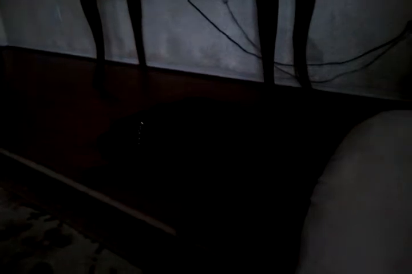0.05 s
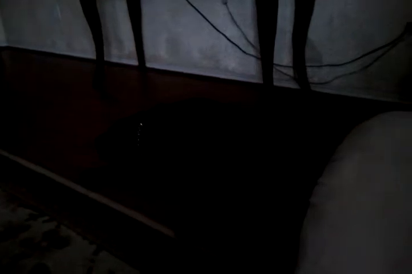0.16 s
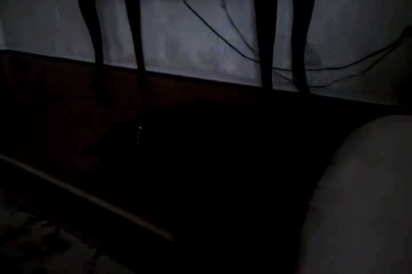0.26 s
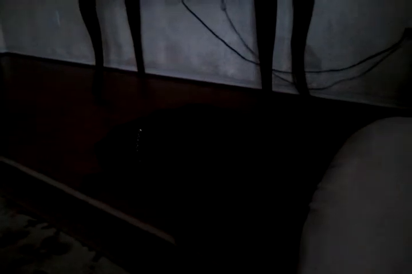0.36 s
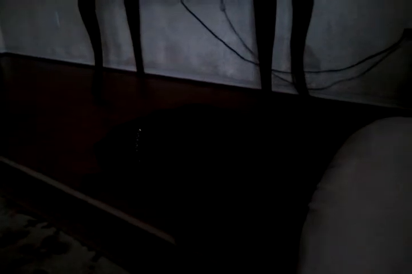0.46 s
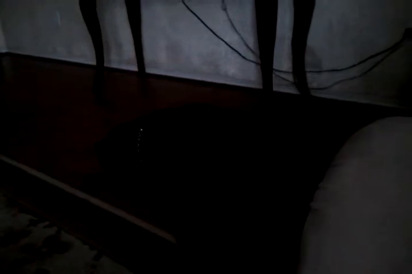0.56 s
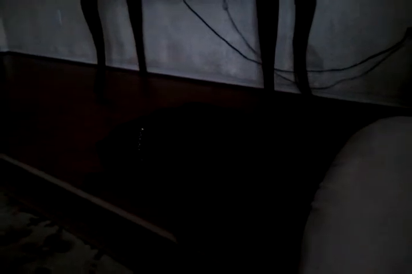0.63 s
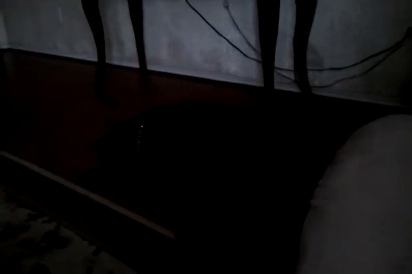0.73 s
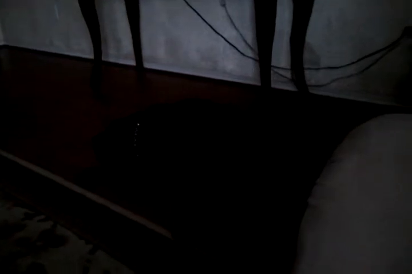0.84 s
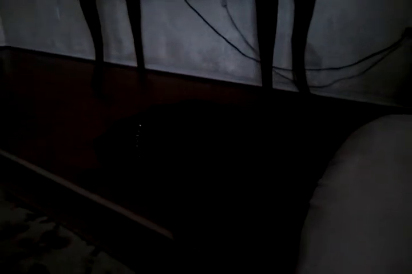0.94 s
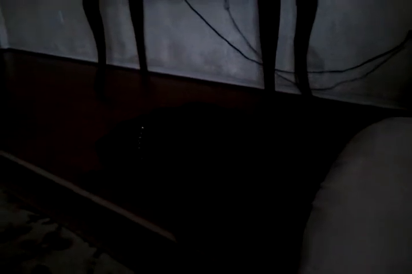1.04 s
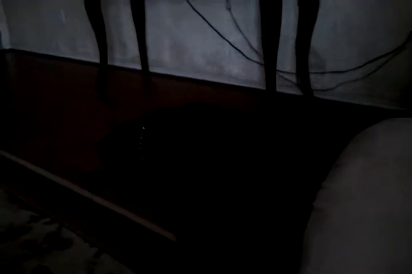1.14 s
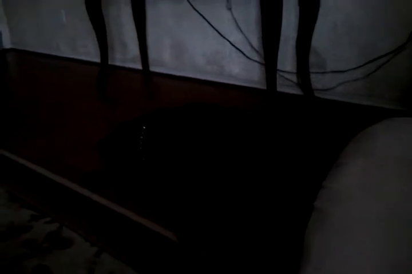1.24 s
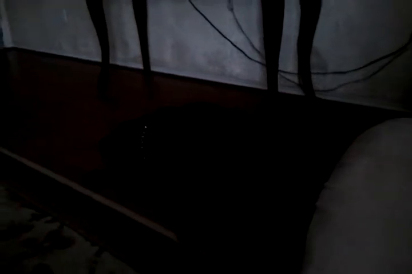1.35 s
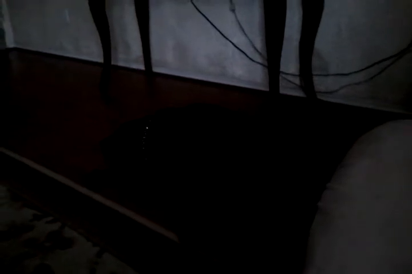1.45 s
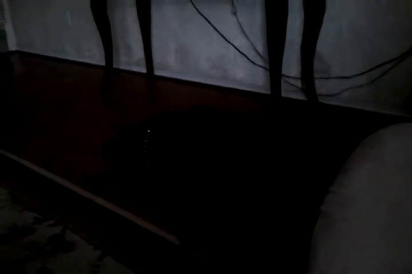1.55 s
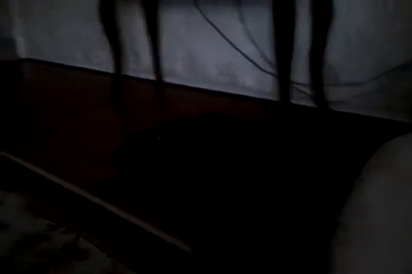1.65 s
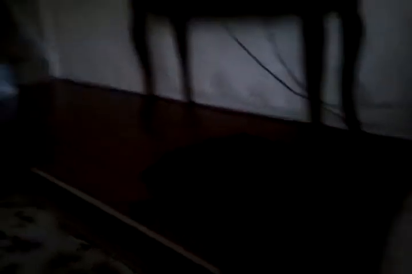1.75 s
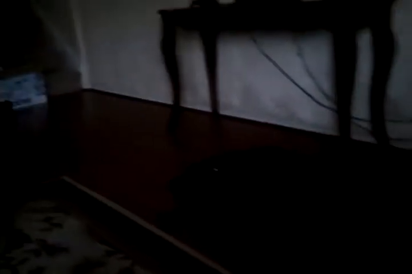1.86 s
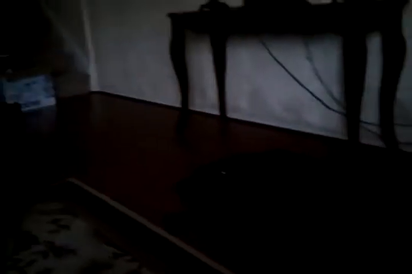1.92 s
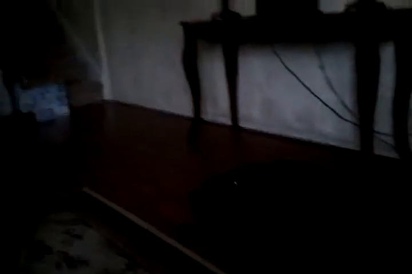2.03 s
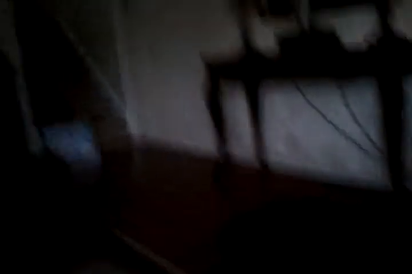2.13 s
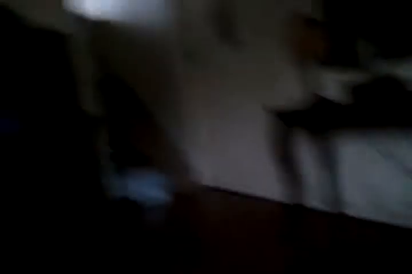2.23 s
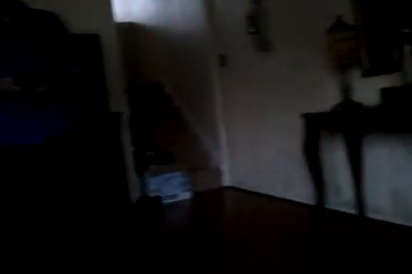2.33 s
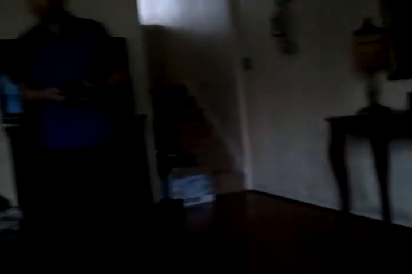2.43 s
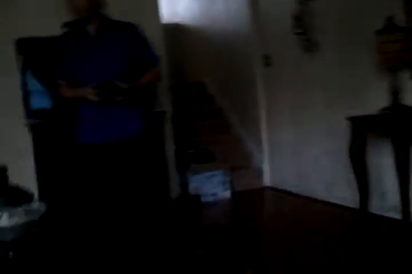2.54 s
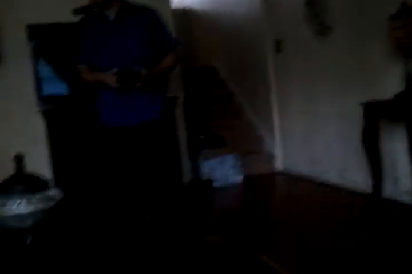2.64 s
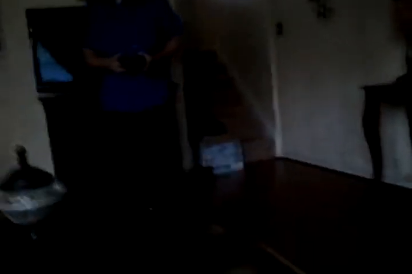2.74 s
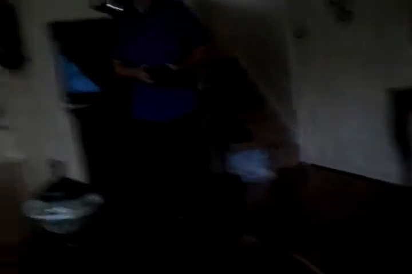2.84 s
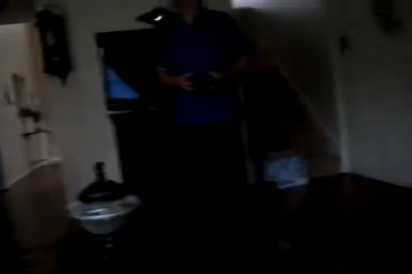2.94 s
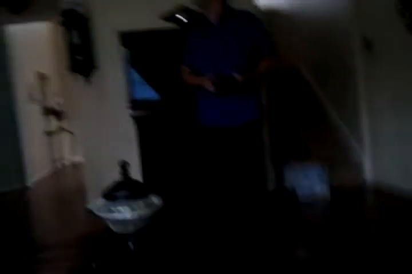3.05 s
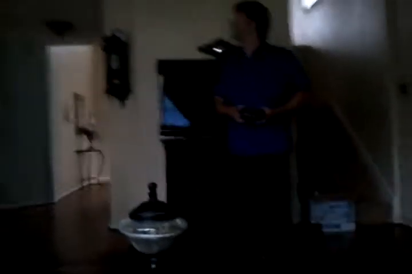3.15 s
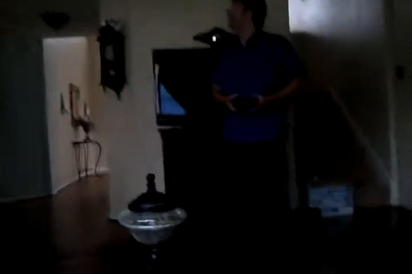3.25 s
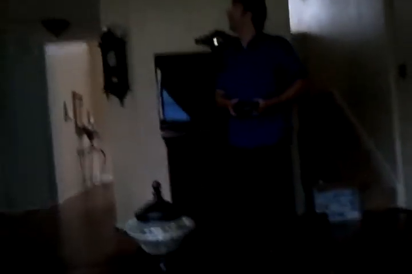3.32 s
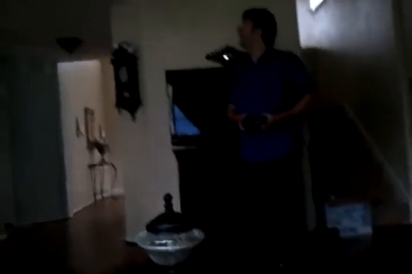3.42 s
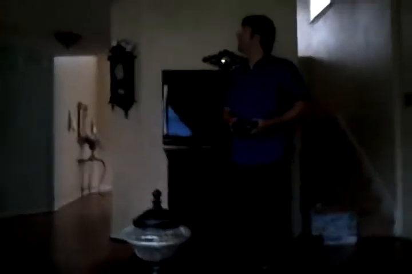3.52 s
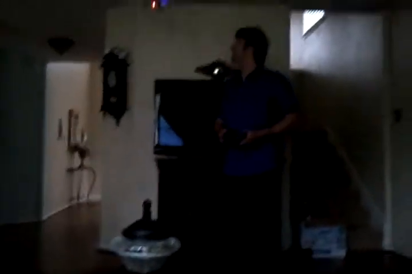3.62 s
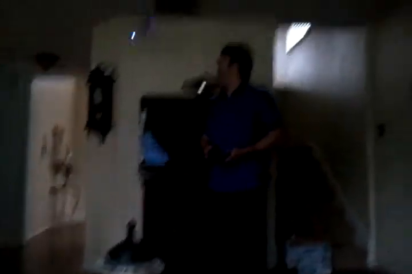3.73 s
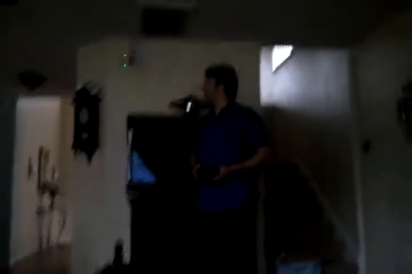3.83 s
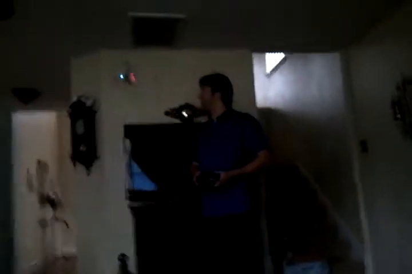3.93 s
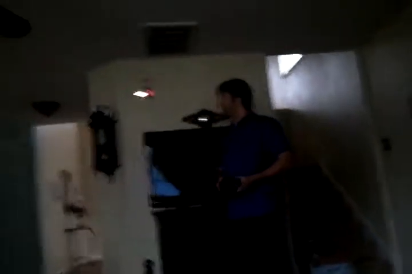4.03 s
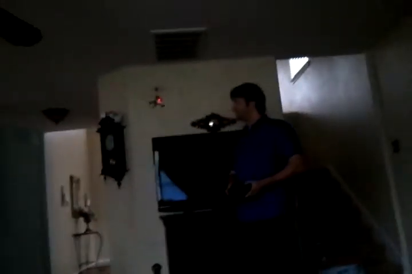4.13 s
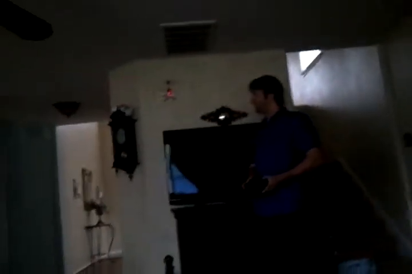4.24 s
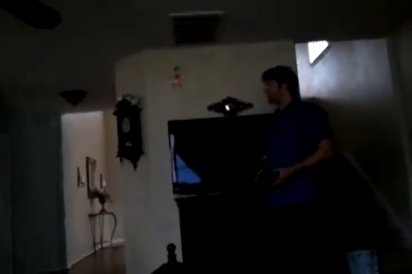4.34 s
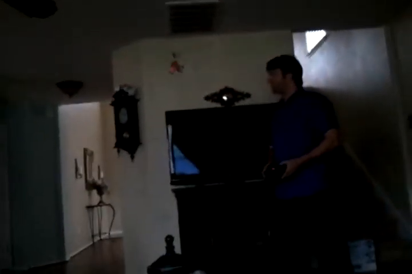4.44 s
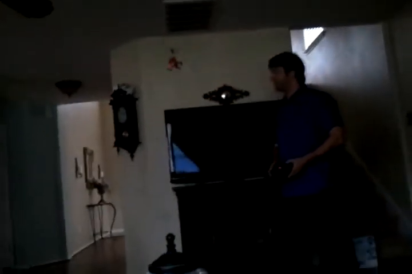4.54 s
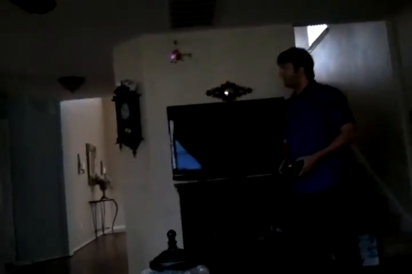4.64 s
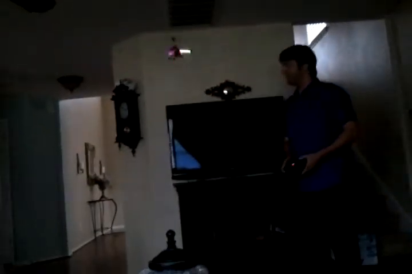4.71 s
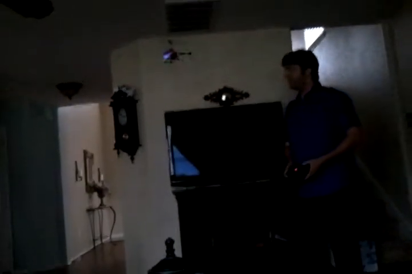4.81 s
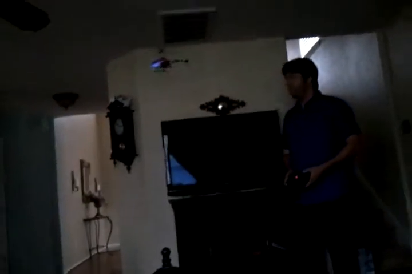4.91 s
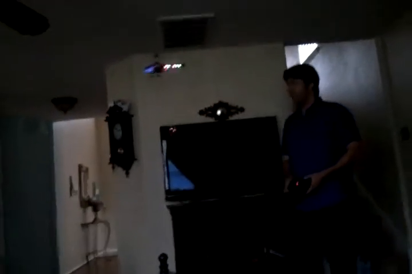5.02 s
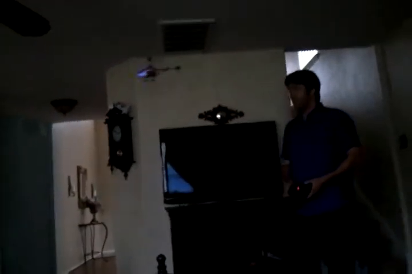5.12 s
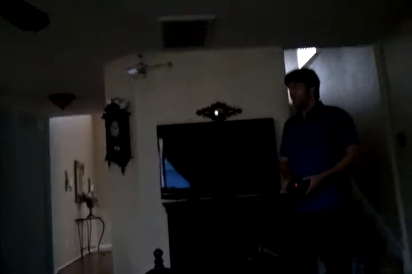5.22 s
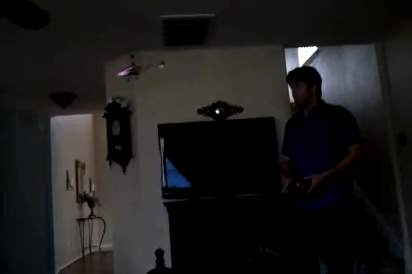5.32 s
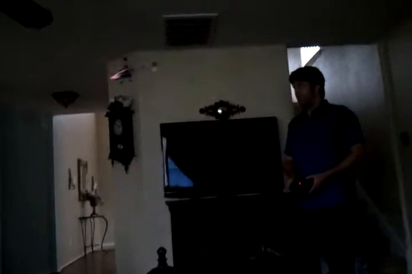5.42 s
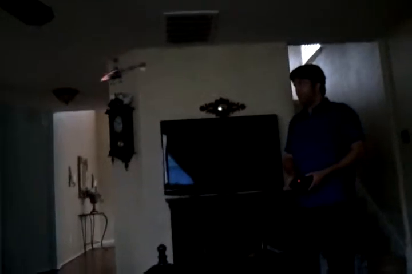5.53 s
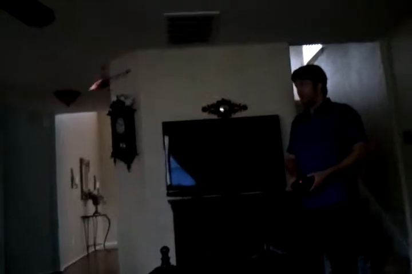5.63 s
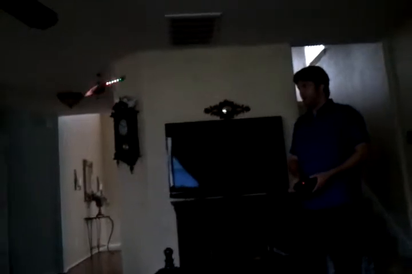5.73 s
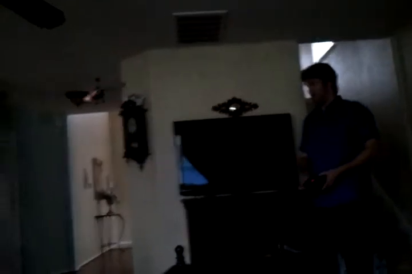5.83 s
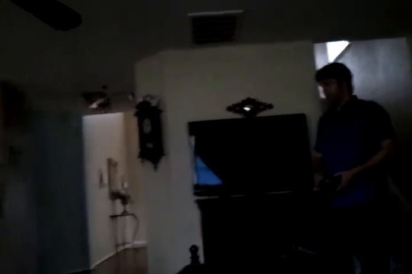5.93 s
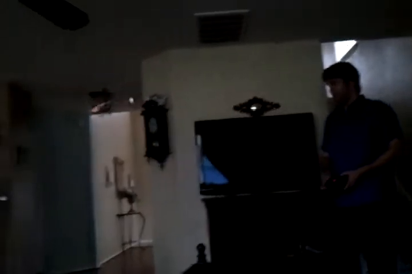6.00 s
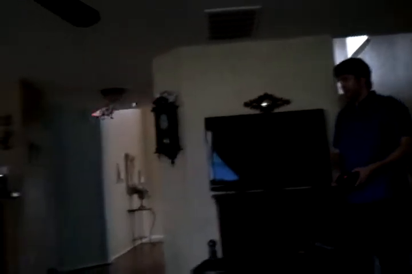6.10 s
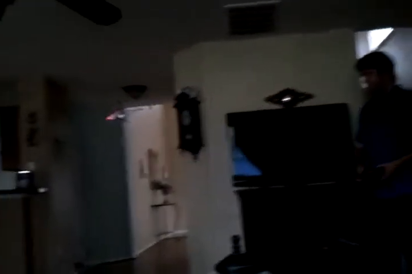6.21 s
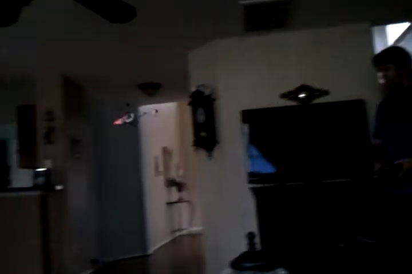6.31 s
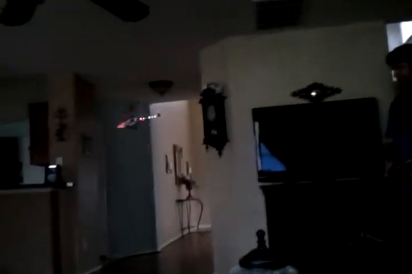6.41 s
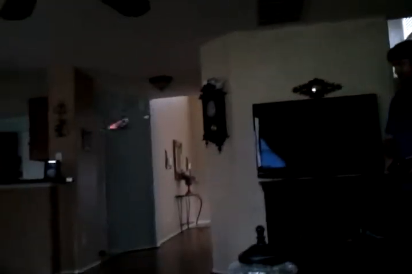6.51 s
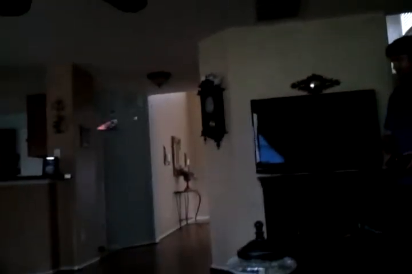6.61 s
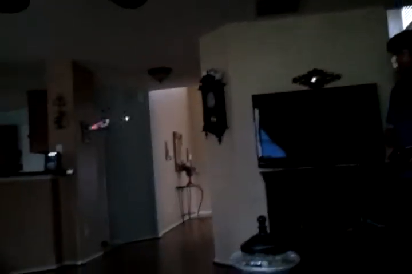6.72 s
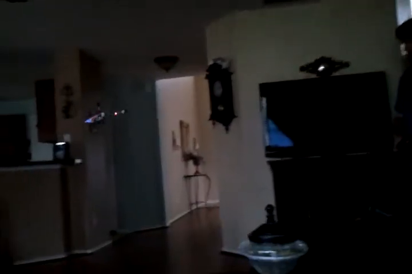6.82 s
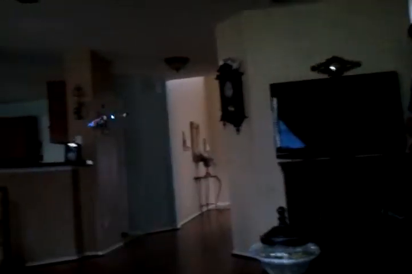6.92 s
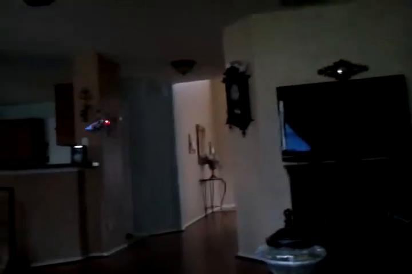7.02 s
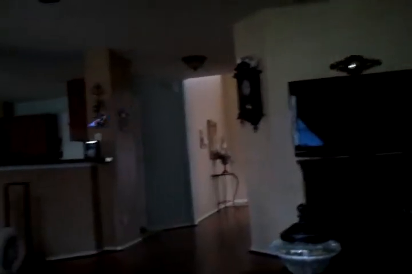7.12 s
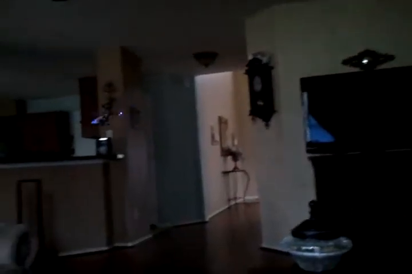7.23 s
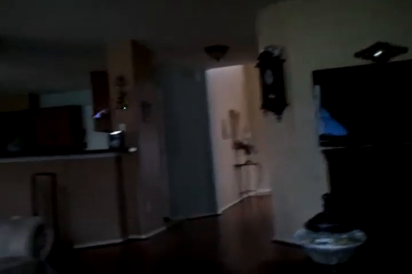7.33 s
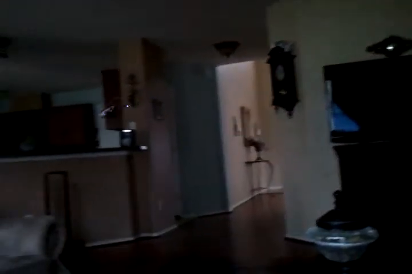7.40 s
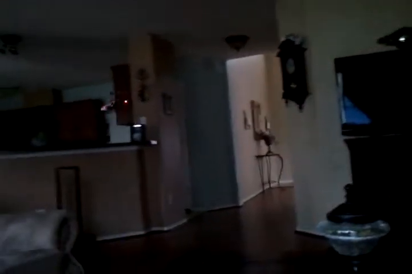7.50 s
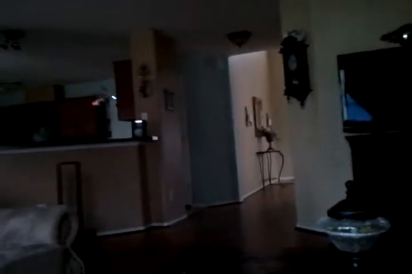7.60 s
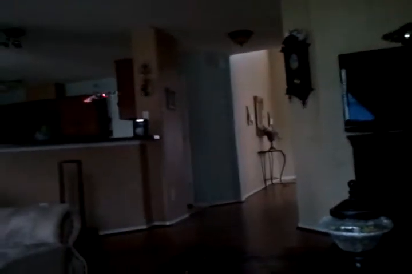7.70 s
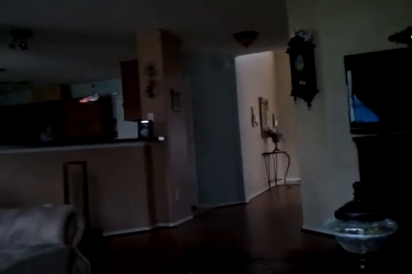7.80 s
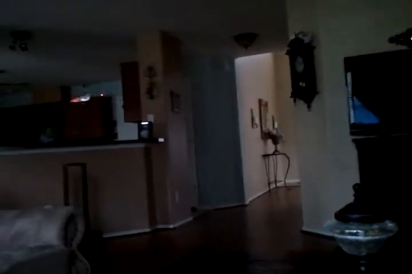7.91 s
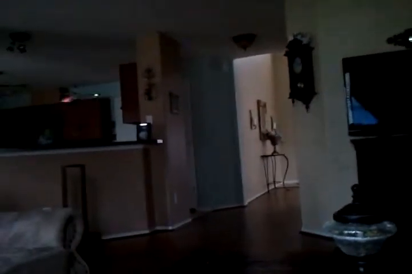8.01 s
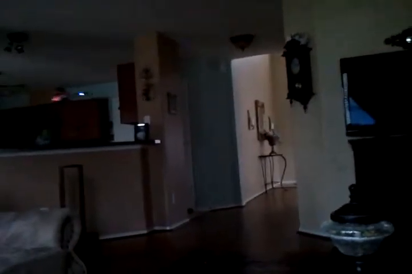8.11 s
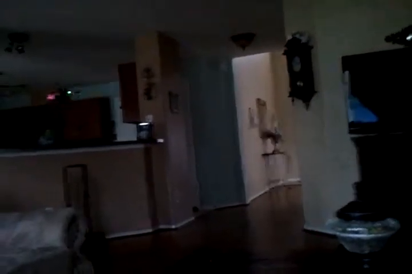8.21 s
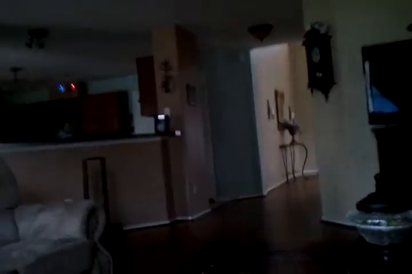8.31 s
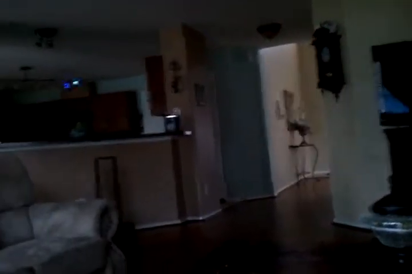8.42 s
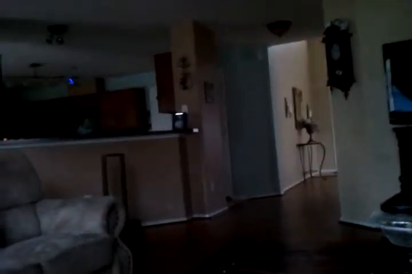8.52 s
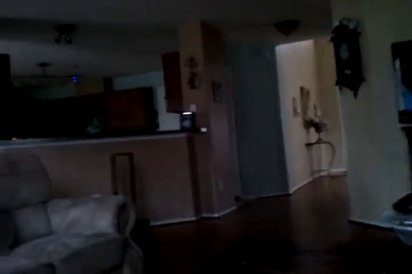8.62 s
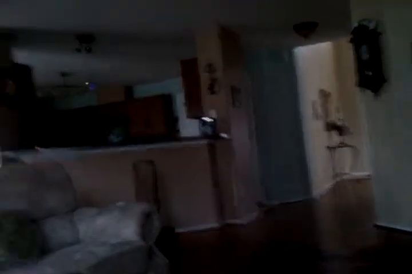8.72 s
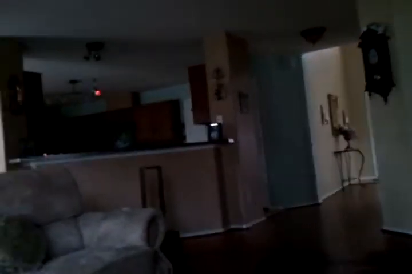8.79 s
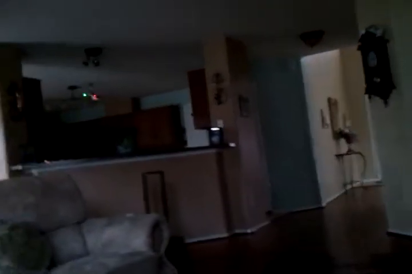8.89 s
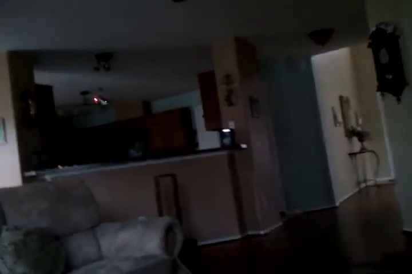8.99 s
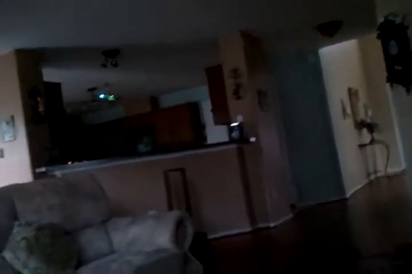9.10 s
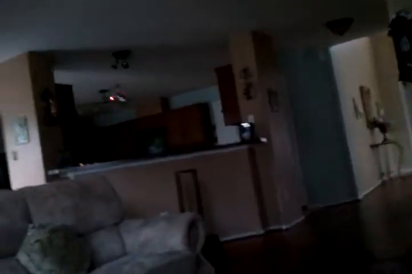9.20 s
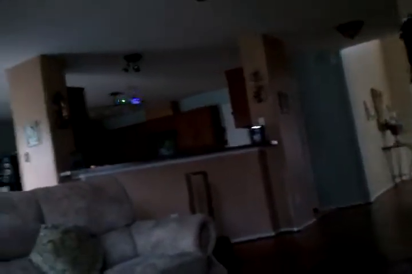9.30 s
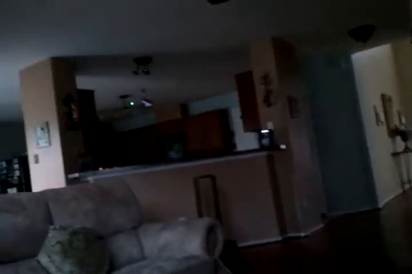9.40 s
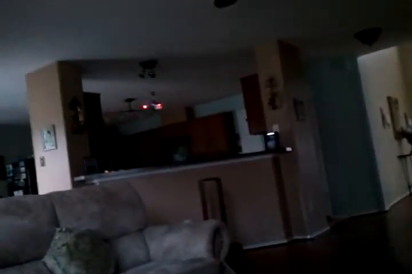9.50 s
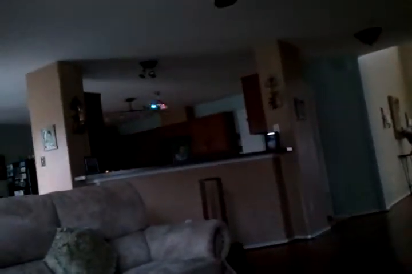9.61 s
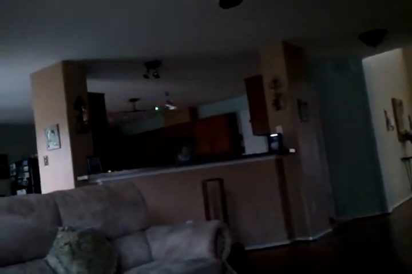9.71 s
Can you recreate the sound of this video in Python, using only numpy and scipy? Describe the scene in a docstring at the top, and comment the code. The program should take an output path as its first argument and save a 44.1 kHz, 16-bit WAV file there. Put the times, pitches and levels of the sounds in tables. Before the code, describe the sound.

A small electric toy helicopter starts on the floor near a handheld mono microphone. Faint room murmur, two soft thuds, clicking gears and brief motor rasps come first, then a fast run-up with a little squeal as a gear catches. The dense, hissing, buzzing whine sags, swells, and settles into a fluctuating hover, drifting farther across the reverberant living room.

```python
"""Toy helicopter lifting off in a living room

Two dull knocks and short throttle blips on the ground, then run-up, lift-off and a hover that drifts away.
Each motor whines on orders of its shaft; its pinion teeth hit a plastic gear as noise bursts,
which also buzz the airframe. Shaped noise makes the rotor wash and the still room; decaying noise, the echo."""
import sys
import numpy as np
from scipy import signal
from scipy.fft import rfft, irfft, next_fast_len
from scipy.io import wavfile
from scipy.ndimage import uniform_filter1d, map_coordinates

SR = 44100
rng = np.random.default_rng(int(sys.argv[2]) if len(sys.argv) > 2 else 0)


def to_wav(s):
    """Save 16-bit WAV."""
    ch = np.atleast_2d(s).T  # columns
    pcm = np.round(np.clip(ch, -1, 1) * 32767)  # PCM
    wavfile.write(sys.argv[1], SR, pcm.astype(np.int16))


N = 429975


def amp(db):
    """Decibels to gain."""
    return 10 ** (np.asarray(db) / 20)


def unit(x):
    """Scale to rms 1."""
    return x / np.sqrt(np.mean(x ** 2) + 1e-20)


def along(points, hz):
    """Interpolate (Hz, value) points on a log frequency axis."""
    point_hz, value = np.transpose(points)
    return np.interp(np.log(hz + 1), np.log(point_hz + 1), value)


def curves(rows):
    """One value per sample for each column after the time."""
    time_s, *columns = np.transpose(rows)
    return [np.interp(np.arange(N) / SR, time_s, column) for column in columns]


def wobble(rate_hz):
    """Smooth random curve with rate_hz knots a second."""
    knots = rng.standard_normal(int(N * rate_hz / SR) + 4)
    return map_coordinates(knots, [np.arange(N) * rate_hz / SR])


def age(start_s):
    """Seconds since a moment, zero before it."""
    return np.maximum(np.arange(N) / SR - start_s, 0)


def rise(start_s, time_constant_s):
    """Exponential approach from 0 to 1."""
    return 1 - np.exp(-age(start_s) / time_constant_s)


def burst(start_s, length_s, attack_s, fall_db_per_s):
    """Attack, hold and a steady fall in dB."""
    return rise(start_s, attack_s) * amp(-fall_db_per_s * age(start_s + length_s))


def filtered(x, response):
    """Apply a response of frequency, with padding against wrap-around."""
    size = next_fast_len(N + SR // 2)
    return irfft(rfft(x, size) * response(np.fft.rfftfreq(size, 1 / SR)), size)[:N]


def coloured(x, spectrum):
    """x through a (Hz, dB) spectrum, at rms 1."""
    return unit(filtered(x, lambda hz: amp(along(spectrum, hz))))


def noise(spectrum):
    """Noise of rms 1 with the given spectrum."""
    return coloured(rng.standard_normal(N), spectrum)


# reverberation: pitch_hz, t60_s
ROOM_DECAY = [(200, 0.44), (2000, 0.31), (8000, 0.48)]


def in_room(x, wet_db):
    """Direct sound plus a decaying noise tail, redrawn every quarter second as for a moving source."""
    hop, length = SR // 4, SR // 2
    echo = np.zeros(N + 2 * SR)
    padded = np.pad(x, (hop, SR))
    # root-Hann: independent tails cross-fade at equal power
    window = np.sqrt(signal.get_window("hann", 2 * hop))
    for start in range(0, N + hop, hop):
        hz, t, z = signal.stft(rng.standard_normal(length), SR, nperseg=256)
        decay = amp(-60 * t / along(ROOM_DECAY, hz)[:, None])
        tail = signal.istft(z * decay, SR, nperseg=256)[1]
        answer = signal.fftconvolve(padded[start:start + 2 * hop] * window, tail / np.linalg.norm(tail))
        echo[start:start + len(answer)] += answer
    return (x + amp(wet_db) * echo[hop:hop + N]) / np.hypot(1, amp(wet_db))


def tone(turns, multiple):
    """Sine of rms 1 on a multiple of the shaft speed, at a random phase."""
    return np.sqrt(2) * np.sin(2 * np.pi * (multiple * turns + rng.random()))


def rough_tone(turns, multiple, rough):
    """Line of rms about 1, its amplitude roughened by play in the gears."""
    return tone(turns, multiple) * unit(1 + rough * wobble(90))


# murmur of the still room: pitch_hz, relative level_db per Hz
ROOM_MURMUR = [(24, -68.5), (40, -33.5), (171, -20.5), (207, -16.5), (242, -7.5), (268, -10.5), (293, -16),
               (360, -14.5), (443, -16.5), (2500, -28.5), (3250, -64.5), (5500, -120)]
STILL_DB = -51


def still_room():
    """Shaped noise plus a faint mains hum on the fourth harmonic of 60 Hz."""
    mains_turns = np.arange(N) / SR * 60
    hum = amp(-63 + 1.6 * wobble(3.5)) * tone(mains_turns, 4)
    return hum + amp(STILL_DB) * noise(ROOM_MURMUR)


# air off the blades: pitch_hz, relative level_db per Hz
WASH_SPECTRUM = [(12, -32.5), (20, -3.5), (91, -5), (124, -1), (208, -6.5), (245, -6.5), (287, -3.5),
                 (349, -2), (557, -3), (655, -0.5), (950, -3), (1240, -31), (2090, -120)]


def rotor_wash(wash_gain):
    """Blades stir the air: shaped noise with random level flutter."""
    return wash_gain * amp(0.98 * wobble(8.7)) * noise(WASH_SPECTRUM)


# knocks: start_s, relative level_db
KNOCK_TIMES = [(0.376, -19.5), (0.474, -24)]
# hollow body's resonances: pitch_hz, width_hz, level_db
HOLLOW_MODES = [(169, 43, -5), (265, 68, -0.5), (615, 30, -1.5), (1030, 53, -5), (2150, 91, -7),
                (2520, 99, -10), (4580, 300, -19), (5700, 400, -17.5), (7240, 300, -14.5)]


def hollow_body(hz):
    """Sum of second-order resonances of alternating sign."""
    response = 0
    for k, (pitch_hz, width_hz, level_db) in enumerate(HOLLOW_MODES):
        damping = 1j * hz * width_hz
        response = response + (-1) ** k * amp(level_db) * damping / (pitch_hz ** 2 - hz ** 2 + damping)
    return response


def knocks():
    """Two dull knocks: short scuffing contacts through a hollow body's resonances."""
    t60_s, attack_s = 0.22, 0.0063
    contact = sum(amp(level_db - 5.0 - 60 * age(start_s) / t60_s) * rise(start_s, attack_s)
                  for start_s, level_db in KNOCK_TIMES)
    return contact * unit(filtered(rng.standard_normal(N), hollow_body))


# slack taken up: start_s, relative level_db
CLACK_TIMES = [(0.5626, -11), (0.615, -3), (0.6424, -6.5), (1.1393, -30), (1.1794, -15.5), (1.3024, -12),
               (1.376, -13)]
# unloaded gears, also in gear_rattle: pitch_hz, relative level_db per Hz
UNLOADED_GEARS = [(70, -45.5), (250, -16), (1800, -17.5), (2300, -7.5), (2900, -7), (3500, -10),
                  (4100, -10), (4800, -5), (5700, -4), (6300, -5), (6800, -0.5), (7500, -4), (8200, -9),
                  (8900, -38), (10000, -57.5)]


def clacks():
    """Gears and loose blade hinges snap taut as the throttle opens: short noise decays."""
    t60_s, attack_s = 0.05, 0.0017
    snaps = sum(amp(level_db - 7.5 - 60 * age(start_s) / t60_s) * rise(start_s, attack_s)
                for start_s, level_db in CLACK_TIMES)
    return snaps * noise(UNLOADED_GEARS)


# both shafts on the ground, coasting and blipped: time_s, shaft_hz
GROUND_SPEED = [(0, 69.2), (.54, 50.28), (.66, 160.8), (1.12, 60), (1.18, 139.7)]
# speed asked of both motors in flight: time_s, shaft_hz
FLIGHT_THROTTLE = [(1.85, 380.8), (2.68, 385), (2.86, 366), (3.2, 346.6), (3.48, 314.6), (3.7, 298.3),
                   (3.86, 314.7), (3.98, 352.8), (4.2, 376), (4.4, 379), (4.55, 356), (4.95, 334.7),
                   (5.55, 345.6), (6.1, 344.3), (6.9, 353.9), (7.9, 354.5), (9.0, 340.8), (9.75, 345.7)]
# upper motor up, lower down by as much: start_s, end_s, first_shift_hz, last_shift_hz
STEERING_SHIFTS = [(1.2, 2.662, 16, 15), (3.82, 4.471, 10, 11), (5.87, 6.22, -12, -13),
                   (7.8, 9.08, -16, -3), (9.089, 9.5, 13, -1)]
# upper gear catches on the way up: time_s, lost_shaft_hz
GEAR_SNAG = [(1.33, 0), (1.368, 34), (1.386, 0)]
STEER_S = .1  # smoothing of steering
HUNT_HZ, HUNTS_PER_S = 1.0, 7  # gyro's random nudges: depth, rate
UPPER_START_S, UPPER_SPIN_UP_S = 1.27, .122  # start, time constant
LOWER_START_S, LOWER_SPIN_UP_S = 1.35, .16  # breaks loose later


def motors():
    """Shaft speeds lag throttle and steering; the mean shortfall over throttle stands for torque."""
    t = np.arange(N) / SR
    throttle_hz, = curves(FLIGHT_THROTTLE)
    ground_hz, = curves(GROUND_SPEED)
    snag_hz, = curves(GEAR_SNAG)
    steering_hz = sum(np.interp(t, [start_s, end_s], [first_hz, last_hz], left=0, right=0)
                      for start_s, end_s, first_hz, last_hz in STEERING_SHIFTS)
    steering_hz = uniform_filter1d(steering_hz, size=int(STEER_S * SR))
    shift_hz = steering_hz + HUNT_HZ * wobble(HUNTS_PER_S)
    upper_gap_hz = throttle_hz + shift_hz - ground_hz
    lower_gap_hz = throttle_hz - shift_hz - ground_hz
    upper_hz = ground_hz + upper_gap_hz * rise(UPPER_START_S, UPPER_SPIN_UP_S) - snag_hz
    lower_hz = ground_hz + lower_gap_hz * rise(LOWER_START_S, LOWER_SPIN_UP_S)
    torque = 1 - (upper_hz + lower_hz) / 2 / throttle_hz
    return upper_hz, lower_hz, torque


# ground throttle blips: start_s, length_s, rattle level_db, attack_s, coast_db_per_s
THROTTLE_BLIPS = [(-.1, 0.092, -45, .02, 22), (0.54, 0.097, -24, .04, 70), (.87, .06, -53.5, .03, 30.5),
                  (1.14, 0.055, -29.5, 0.028, 91), (1.23, 0.044, -23.5, 0.03, 149.5)]


def blips():
    """Gear noise gain on the ground: each blip rises, holds and coasts down."""
    return sum(amp(level_db) * burst(start_s, length_s, attack_s, coast_db_per_s)
               for start_s, length_s, level_db, attack_s, coast_db_per_s in THROTTLE_BLIPS)


# level as the toy flies off: time_s, gears_db, wash_db
FLIGHT_LEVEL = [(1.55, 1, 0), (1.85, -0.6, -0.5), (2.4, -0.86, 2), (3.3, -3, -4.5), (4.9, -3, -2),
                (5.6, -3, -1), (6.5, -3.1, -2), (9.1, -5.5, -6.5), (9.7, -4, -5.5)]
HOVER_HZ = 350  # reference shaft speed
LIFT_S, LIFT_ATTACK_S = 1.295, 0.017  # full power reaches the gears
# gains before nearness, at hover speed; slope with speed; extra per unit torque
RATTLE_DB, RATTLE_DB_PER_OCTAVE, RATTLE_TORQUE_DB = -13.5, 8.5, 9.5
FRAME_DB, FRAME_DB_PER_OCTAVE, FRAME_TORQUE_DB = -37.5, 6.5, 12
WASH_DB, WASH_DB_PER_OCTAVE = -46, 9.5
BLIP_FRAME_DB, BLIP_WASH_DB = -18, -28.5  # re a blip's rattle gain


def strengths(upper_hz, lower_hz, torque):
    """Gains of rattle, frame and wash rise with speed and nearness; the first two also with torque."""
    near_db, wash_near_db = curves(FLIGHT_LEVEL)
    octaves = np.log2((upper_hz + lower_hz) / 2 / HOVER_HZ)
    flying, ground = rise(LIFT_S, LIFT_ATTACK_S), blips()
    rattle_db = RATTLE_DB + near_db + RATTLE_DB_PER_OCTAVE * octaves + RATTLE_TORQUE_DB * torque
    frame_db = FRAME_DB + 0.59 * near_db + FRAME_DB_PER_OCTAVE * octaves + FRAME_TORQUE_DB * torque
    wash_db = WASH_DB + wash_near_db + WASH_DB_PER_OCTAVE * octaves
    rattle_gain = flying * amp(rattle_db) + ground
    frame_gain = flying * amp(frame_db) + amp(BLIP_FRAME_DB) * ground
    wash_gain = flying * amp(wash_db) + amp(BLIP_WASH_DB) * ground
    return rattle_gain, frame_gain, wash_gain


def shaft(hz, flutter, chatter):
    """Turns made by a shaft whose speed flutters with blade load and gear play."""
    return np.cumsum(hz * (1 + flutter * wobble(45) + chatter * wobble(400))) / SR


PINION_TEETH, GEAR_RATIO = 9, 10.5  # ratio: motor turns per rotor turn


def tooth_hits(turns, scatter_db, wobble_db):
    """Each tooth lands as a tiny noise burst, harder once per turn of the eccentric main gear."""
    mesh = turns * PINION_TEETH
    tooth_gain = amp(scatter_db * rng.uniform(-1, 1, int(mesh[-1]) + 1))
    load = amp(wobble_db * np.sin(2 * np.pi * turns / GEAR_RATIO))
    decay = np.exp(-2 * (mesh % 1))
    return unit(tooth_gain[mesh.astype(int)] * load * decay * rng.standard_normal(N))


# airframe buzz: pitch_hz, relative level_db per Hz
FRAME_SPECTRUM = [(700, -16.5), (1000, -0.5), (1250, 0.5), (1400, 7), (1520, 0.5), (1660, 5), (1850, -1.5),
                  (2220, 0), (2600, -2.5), (3100, -2.5), (3600, -1), (4300, -4), (6000, -32.5)]


def airframe_buzz(hits, frame_gain):
    """Tooth hits shake the airframe, which colours them."""
    return frame_gain * coloured(hits, FRAME_SPECTRUM)


# gears under full load: pitch_hz, relative level_db per Hz
CLIMB_GEARS = [(1940, -45.5), (3300, -26), (3720, -22), (4110, -23.5), (4590, -9.5), (5050, -8.5),
               (5700, -0.5), (6830, 2), (7330, 1), (8550, -15.5), (8870, -29), (11500, -56.5),
               (19500, -120)]
# gears in hover: pitch_hz, relative level_db per Hz
HOVER_GEARS = [(1940, -50), (3300, -14.5), (3500, -19.5), (3960, -16), (4520, -10), (5100, -1.5), (5790, 0),
               (6270, 0.5), (6780, -0.5), (7420, -3.5), (8060, -10), (8870, -30.5), (11500, -78.5),
               (19500, -120)]


def gear_rattle(hits):
    """Tooth hits change colour from unloaded to climbing to hovering."""
    flying, = curves([(1.15, 0.28), (1.3, 0.97)])
    hovering, = curves([(2, 0.026), (3, 0.73)])
    aloft = (1 - hovering) * coloured(hits, CLIMB_GEARS) + hovering * coloured(hits, HOVER_GEARS)
    return amp(-1.36) * (flying * aloft + (1 - flying) * coloured(hits, UNLOADED_GEARS))


# airframe's answer to the three-pole tone: pitch_hz, level_db
THREE_POLE_RESPONSE = [(840, -54.5), (900, -44.5), (950, -53.5), (1022, -54), (1058, -42.5), (1104, -39.5),
                       (1160, -49.5), (1200, -55)]


def three_pole_tone(hz, turns):
    """Third shaft order swells as it passes the airframe's resonances."""
    _, wash_near_db = curves(FLIGHT_LEVEL)
    return amp(along(THREE_POLE_RESPONSE, 3 * hz) + .8 * wash_near_db) * rough_tone(turns, 3, rough=.25)


# canopy resonance: pitch_hz, level_db
CANOPY = [(1150, -18.5), (1320, 0.5), (1390, -0.5), (1450, -6.5), (1560, -17.5)]
FOURTH_DB, FOURTH_FADE_DB, FOURTH_DB_PER_HZ = -45, 1.4, 0.1  # base, random fading, loss as speeds part


def canopy_tone(upper_hz, lower_hz, upper, lower):
    """Fourth order of both shafts rings the canopy."""
    level_db = FOURTH_DB + FOURTH_FADE_DB * wobble(4) - FOURTH_DB_PER_HZ * np.abs(upper_hz - lower_hz)
    return amp(level_db) * coloured(tone(upper, 4) + tone(lower, 4), CANOPY)


# upper shaft orders: multiple, relative level_db
UPPER_SHAFT_ORDERS = [(5, -39.5), (6, -39), (7, -36), (8, -31), (10, -29.5), (11, -28), (12, -28),
                      (13, -28.5), (14, -25), (15, -21.5), (16, -20), (17, -22.5), (18, -19.5)]
# lower shaft orders: multiple, relative level_db
LOWER_SHAFT_ORDERS = [(6, -36), (8, -36.5), (9, -30), (12, -28.5), (15, -21), (18, -11), (21, -15.5)]
ORDERS_DB_PER_OCTAVE = 23  # loss below hover speed


def shaft_orders(hz, turns, table, rough):
    """Stack of rough shaft orders, standing out more as the motor nears hover speed."""
    speed_gain = amp(ORDERS_DB_PER_OCTAVE * np.minimum(np.log2(hz / HOVER_HZ), 0))
    return speed_gain * sum(amp(level_db) * rough_tone(turns, round(multiple), rough)
                            for multiple, level_db in table)


# how the gears radiate the mesh octave: pitch_hz, level_db
OCTAVE_RADIATION = [(4600, -20.5), (5600, -6.5), (6400, 1), (7000, 0.5), (7700, -5)]
MESH_DB, MESH_GLIDE_DB, MESH_FADE_DB = -34.5, 4.5, 1.5  # base, extra while speed changes, random fading
GLIDE_HZ_PER_S = 300  # speed change giving all of that extra
SNAG_DB = 7  # squeal while the gear catches
BREAKAWAY_DB, BREAKAWAY_S, BREAKAWAY_DB_PER_S = -31, .035, 110  # level, hold, fall
BLIP_GROWL_DB = -25  # re a blip's rattle gain
OCTAVE_DB = -7  # re rattle gain, before radiation


def mesh_whine(upper_hz, upper, lower, rattle_gain):
    """Tooth-mesh tones: steady upper whine, lower growl breaking loose, upper octave under strain."""
    near_db, _ = curves(FLIGHT_LEVEL)
    speeding_up_hz_per_s = uniform_filter1d(np.gradient(upper_hz) * SR, size=SR // 20)
    # eccentric main gear spreads the tone into close sidebands
    rocking = 0.01 * tone(upper, 1 / GEAR_RATIO) * (1 + .5 * wobble(6))
    glide = np.minimum(np.abs(speeding_up_hz_per_s) / GLIDE_HZ_PER_S, 1)
    mesh_db = MESH_DB + MESH_GLIDE_DB * glide + MESH_FADE_DB * wobble(7) + 0.44 * near_db
    mesh_db += SNAG_DB * burst(GEAR_SNAG[0][0], 0.033, .004, 900)
    whine = rise(LIFT_S + .016, .012) * amp(mesh_db) * rough_tone(upper + rocking, PINION_TEETH, rough=0.41)

    breakaway = amp(BREAKAWAY_DB) * burst(LIFT_S, BREAKAWAY_S, LIFT_ATTACK_S, BREAKAWAY_DB_PER_S)
    growl_gain = breakaway + amp(BLIP_GROWL_DB) * blips()
    growl = growl_gain * rough_tone(lower, PINION_TEETH, rough=2.0)

    # near full throttle or speeding up, the teeth press hard
    strain = np.clip(np.maximum((upper_hz - 365) / 20, speeding_up_hz_per_s / 280), 0, 1)
    octave_gain = amp(OCTAVE_DB + along(OCTAVE_RADIATION, 2 * PINION_TEETH * upper_hz))
    octave = octave_gain * rough_tone(upper, 2 * PINION_TEETH, rough=0.59)
    return whine + growl + rise(UPPER_START_S, 0.071) * strain * rattle_gain * octave


def helicopter(upper_hz, lower_hz, rattle_gain, frame_gain):
    """Two motors drive the whine, the gear rattle and the airframe buzz, all sounding in the room."""
    upper = shaft(upper_hz, flutter=.002, chatter=.004)
    lower = shaft(lower_hz, flutter=.004, chatter=.005)
    # unequal speeds make the pole tones beat
    low_tones = three_pole_tone(lower_hz, lower) + amp(-10.5) * three_pole_tone(upper_hz, upper)
    low_tones += canopy_tone(upper_hz, lower_hz, upper, lower)
    overtones = shaft_orders(upper_hz, upper, UPPER_SHAFT_ORDERS, rough=0.77)
    overtones += shaft_orders(lower_hz, lower, LOWER_SHAFT_ORDERS, rough=.6)
    whine = mesh_whine(upper_hz, upper, lower, rattle_gain) + rise(LOWER_START_S, 0.16) * low_tones
    whine += rattle_gain * amp(-0.5) * overtones
    hits = sum(tooth_hits(turns, scatter_db=4.5, wobble_db=1.0) for turns in (upper, lower))
    clatter = rattle_gain * gear_rattle(hits) + airframe_buzz(hits, frame_gain)
    return in_room(whine, wet_db=-2.5) + in_room(clatter, wet_db=-4.5)


def scene():
    """Still room, rotor wash, knocks, clacks and helicopter on one channel."""
    upper_hz, lower_hz, torque = motors()
    rattle_gain, frame_gain, wash_gain = strengths(upper_hz, lower_hz, torque)
    background = still_room() + rotor_wash(wash_gain)
    impacts = in_room(knocks() + clacks(), wet_db=0.5)
    return (background + impacts + helicopter(upper_hz, lower_hz, rattle_gain, frame_gain))[None]


TOP_HZ = 9000  # band limit


def record(dry):
    """Peaks round off towards 0.8, then a steep low-pass cuts the top."""
    rounded = dry[0] / (1 + np.abs(dry[0] / .8) ** 6) ** (1 / 6)
    return filtered(rounded, lambda hz: 1 / np.hypot(1, (hz / TOP_HZ) ** 80))[None]


dry = scene()
out = record(dry)
to_wav(out)
```